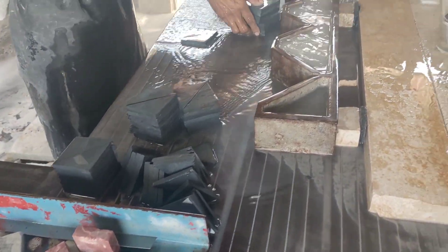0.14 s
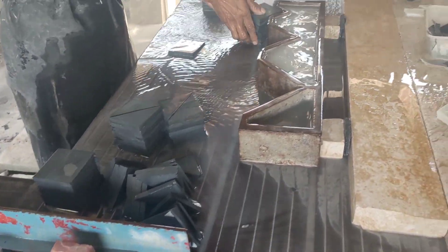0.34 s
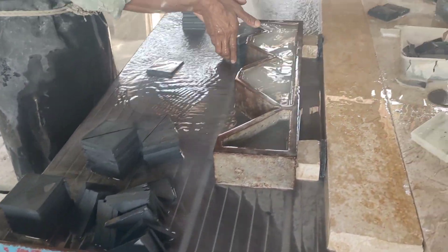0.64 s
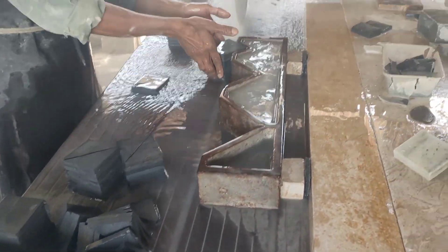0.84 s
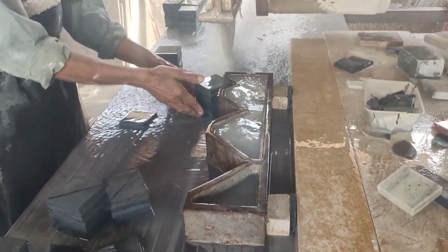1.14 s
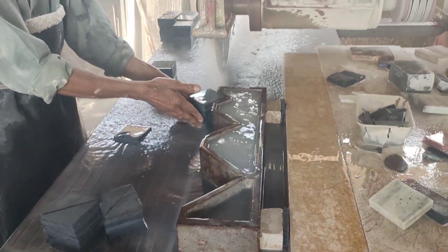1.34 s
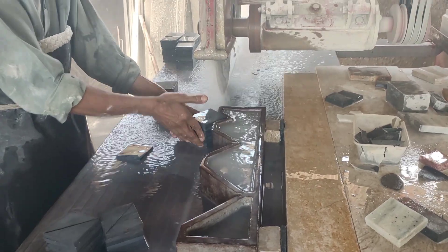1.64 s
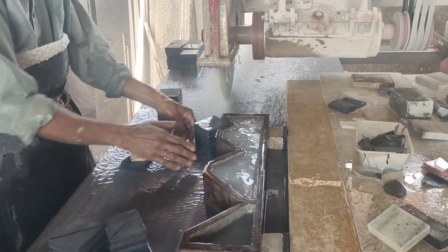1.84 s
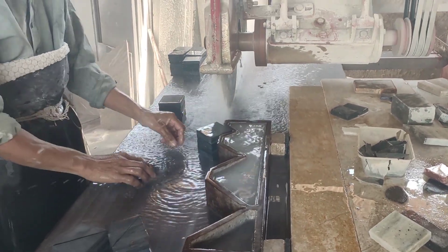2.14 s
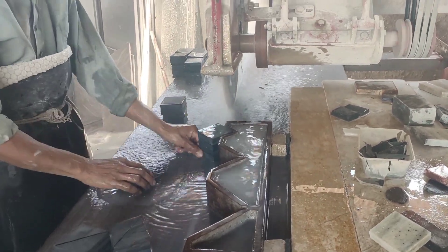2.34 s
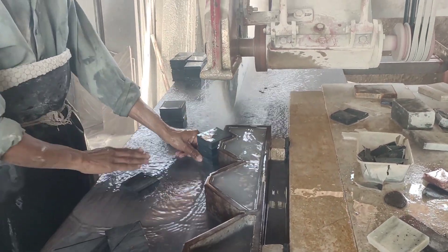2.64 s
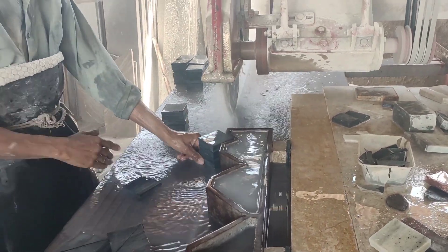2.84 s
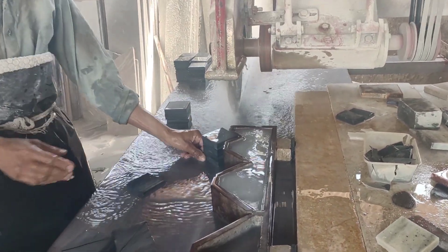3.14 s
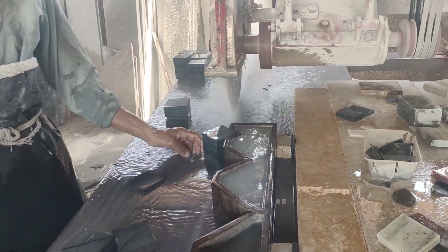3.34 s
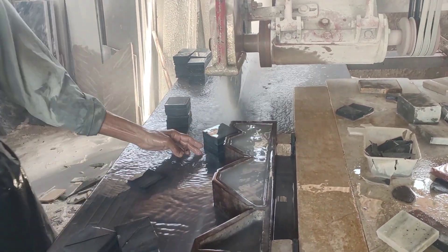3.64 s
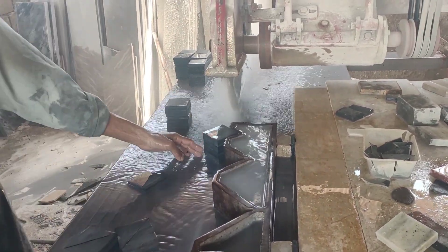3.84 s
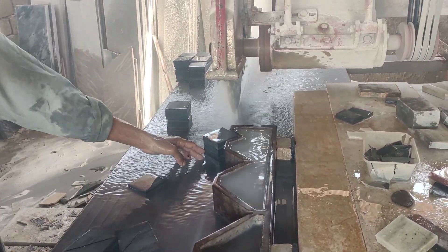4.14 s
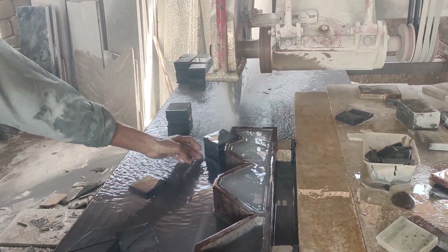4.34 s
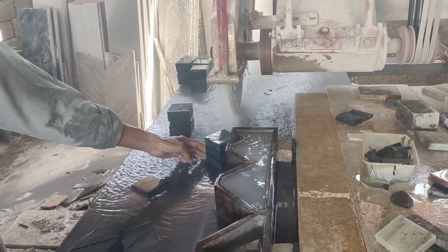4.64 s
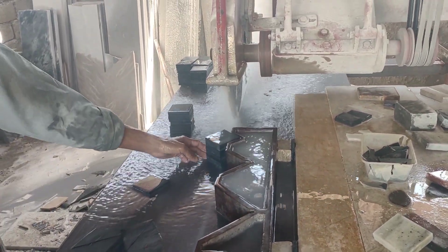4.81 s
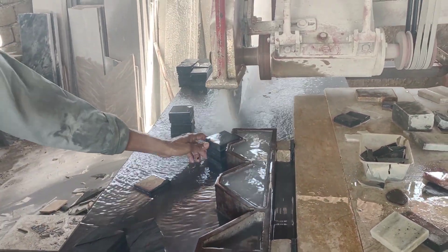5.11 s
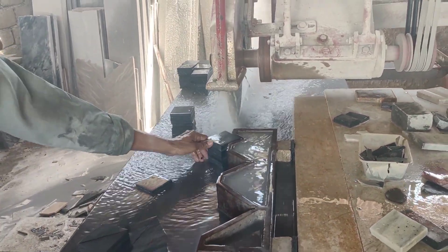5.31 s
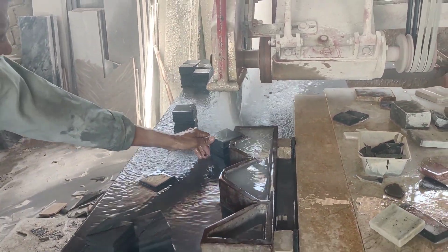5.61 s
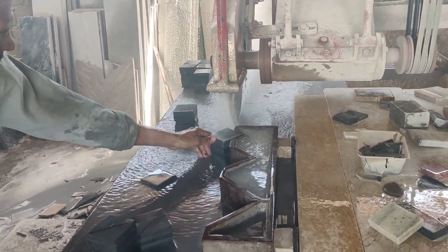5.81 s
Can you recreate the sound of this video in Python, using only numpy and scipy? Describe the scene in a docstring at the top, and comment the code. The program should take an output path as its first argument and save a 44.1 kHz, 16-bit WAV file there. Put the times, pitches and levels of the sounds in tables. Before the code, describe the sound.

From 0 to about 6 seconds a water-cooled stone saw runs continuously at constant speed, loud and close. Its worn ball bearing gives a dense, rough metallic whine: many closely spaced tones, strongest from a few hundred hertz to about two kilohertz, with a shrill layer around three to four kilohertz that is much stronger on the right. The tones beat and drift slightly as the hand-held stereo microphone moves. Around them is a broad wet roar of the spinning blade, with hollow resonances, and a thin hiss of spray. A faint mains hum swells and fades underneath. Soft low air puffs brush the left side at about 0.2 and 0.6 seconds, with a tiny one near 2.2. A faint tile thud comes at 3.7 seconds and a firmer one at 4.0, each with a short low rumble. The saw is still running at the end, without slowing or stopping.

```python
"""Workshop: a water-cooled stone saw runs steadily, heard at a hand-held pair of microphone ports.
A worn eight-ball bearing sings in combs of tones, the loud ones as sines, the faint ones as narrow noise.
The wet blade roars as noise through resonances and the spray hisses as treble noise; a mains hum rises and falls.
Tiles thud softly on the table (one low cycle and a rumble); air puffs on the left port as bass noise.
The right port lifts the whine around 4 kHz."""
import sys
import numpy as np
from scipy import signal
from scipy.fft import rfft, irfft
from scipy.io import wavfile
from scipy.ndimage import uniform_filter1d, minimum_filter1d, map_coordinates

SR = 44100
rng = np.random.default_rng(int(sys.argv[2]) if len(sys.argv) > 2 else 0)


def master_out(mix):
    """Clip the mix to full scale and print it as 16-bit PCM to the path in sys.argv[1]."""
    frames = np.transpose(np.atleast_2d(mix))
    ceiling = np.clip(frames, -1, 1)
    pcm = np.round(ceiling * 32767).astype(np.int16)
    wavfile.write(sys.argv[1], SR, pcm)


def nominal_scale(level):
    """Amplitude ratio for a level in decibels (scalar or array-like)."""
    x = np.asarray(level, float) / 20
    return 10 ** x


N = 263277

SHAFT_HZ = 25.045
INNER_HZ = 123.315  # balls passing a flaw on the turning race
OUTER_HZ = 77.035  # balls passing a flaw on the standing race


def along(points, hz):
    """Reads (Hz, value) points on a log frequency axis."""
    point_hz, values = np.transpose(points)
    return np.interp(np.log(hz + 1), np.log(point_hz + 1), values)


def curves(rows):
    """Interpolates each column after the time to one value per sample."""
    time_s, *columns = np.transpose(rows)
    return [np.interp(np.arange(N) / SR, time_s, column) for column in columns]


def wobble(knots_per_s, count):
    """Smooth random curves through normal knots, held over 64 samples."""
    knots = rng.standard_normal((count, 200))
    position = np.arange(0, N + 64, 64) * knots_per_s / SR
    slow = [map_coordinates(k, [position]) for k in knots]
    return np.repeat(slow, 64, axis=1)[:, :N]


def rush(gain, patchy_db):
    """Stereo turbulence: noise of 0 dB per Hz times gain(Hz), patchy in time and frequency, alike in the bass."""
    # left-right likeness: hz, correlation
    likeness = [(25, .4), (70, 0.97), (130, 0.94), (290, 0.96), (640, 0.49), (1410, 0.038), (3100, 0.046),
                (6800, .02)]
    # right port over left: hz, level_db
    right_over_left = [(30, 0), (500, 0), (1900, 1.5), (2400, 5), (2900, 11.5), (3500, 15.5), (4500, 13.5),
                       (5300, 14), (6400, 3), (7000, -3), (8200, 7.5), (8600, -17), (9500, -12), (9900, -1),
                       (12200, 0), (13500, -6.5), (14600, -8)]
    spectrum = signal.stft(rng.standard_normal((2, N + 8192)), nperseg=512)[2]
    patches = rng.standard_normal(spectrum.shape[1:])
    patches = uniform_filter1d(uniform_filter1d(patches, size=8, axis=0), size=8, axis=1)
    pair = signal.istft(spectrum * nominal_scale(patchy_db * patches / patches.std()), nperseg=512)[1]
    length = pair.shape[1]
    hz = np.fft.rfftfreq(length, 1 / SR)
    angle_rad = np.arccos(np.clip(along(likeness, hz), -1, 1)) / 2
    shares = [np.cos(angle_rad), np.sin(angle_rad)]
    mid, side = rfft(pair) * shares * gain(hz) * np.sqrt(SR / 2)
    left = mid + side
    right = (mid - side) * nominal_scale(along(right_over_left, hz))
    return irfft([left, right], length)[:, :N]


def hum():
    """Mains hum of a neighbouring machine: one sine of varying level."""
    # hum level: time_s, rms_db
    hum_levels = [(0.0, -54), (1.23, -59), (1.58, -64), (2.19, -55), (3.16, -62), (3.74, -51), (4.36, -69),
                  (5.27, -48.5), (5.97, -52.5)]
    return np.sqrt(2) * nominal_scale(curves(hum_levels)[0]) * np.sin(2 * np.pi * 49.9 * np.arange(N) / SR)


def puffs():
    """Short gusts of air buffet the left port only: bass-heavy noise in Gaussian bursts."""
    # gusts: centre_s, half_length_s, rms_db at the centre
    gust_rows = [(.21, .05, -45), (.545, .03, -45), (.615, 0.04, -39), (2.175, .015, -42)]
    # relative spectrum of the air: hz, level_db per Hz
    air_colour = [(12, -30), (25, -3), (70, -2), (130, -8), (200, -22), (400, -60)]
    hz = np.fft.rfftfreq(N, 1 / SR)
    air = irfft(rfft(rng.standard_normal(N)) * nominal_scale(along(air_colour, hz)), N)
    t = np.arange(N) / SR
    gust = sum(nominal_scale(db) * np.exp(-((t - s) / half_s) ** 2) for s, half_s, db in gust_rows)
    return np.array([gust * air / air.std(), np.zeros(N)])


def thuds():
    """Tiles set down, a soft contact: one low cycle, then a short rumble of the table."""
    # contacts: start_s, push_db, push_hz, rumble_db
    contacts = [(3.684, -28, 150, -39), (3.96, -22, 191, -31.5)]
    out = np.zeros(N + SR)
    t = np.arange(SR // 4) / SR
    low_band = signal.butter(2, [60, 260], "band", fs=SR, output="sos")
    for start_s, push_db, push_hz, rumble_db in contacts:
        push = np.sin(2 * np.pi * push_hz * t) * np.exp(-((t * push_hz - .68) / 0.74) ** 2)
        rumble = signal.sosfilt(low_band, rng.standard_normal(len(t)))
        envelope = nominal_scale(-60 * t / 0.44) * (1 - np.exp(-t / 0.0091))  # -60 dB in 0.44 s, 9.1 ms rise
        rumble *= envelope / rumble.std()
        out[round(start_s * SR):][:len(t)] += nominal_scale(push_db) * push + nominal_scale(rumble_db) * rumble
    return out[:N]


def blade():
    """Water and air tear at the spinning blade and ring its resonances; the spray adds a thin top."""
    # change of level: time_s, roar_db, spray_db
    load = [(0, .5, 0), (1, -0.4, 0), (2.5, -0.4, .1), (4, -0.4, 0.1), (5.97, -0.5, -0.3)]
    # roar of motor and wet blade at the left port, before resonances and load: hz, level_db per Hz
    roar_colour = [(20, -83), (60, -76), (85, -75), (200, -71.5), (600, -70.5), (1000, -71), (1520, -69),
                   (2400, -66), (4200, -69), (5400, -72), (6400, -73.5), (7300, -84.5), (8100, -103),
                   (8600, -125)]
    # resonances of blade, guard and frame: centre_hz, width_hz, level_db over the roar
    resonances = [(125.5, 22, 5), (272, 125, 0.5), (453, 146, 4), (752, 112, 5.5), (1098, 190, 7.5),
                  (1408, 95, 9.5), (1628, 42, 7.5), (1790, 140, 5), (1915, 150, 6), (2770, 126, -3),
                  (3210, 210, -1), (3750, 430, 3), (5210, 170, -4)]
    # fine spray at the left port, before load: hz, level_db per Hz
    spray_colour = [(7600, -125), (8150, -104), (8600, -89.5), (9400, -89.5), (9800, -92.5), (11200, -88),
                    (12100, -94), (13800, -89), (14600, -100), (15100, -104), (15200, -130)]

    def ring(hz):
        peaks = (nominal_scale(db) ** 2 / (1 + (2 * (hz - centre_hz) / width_hz) ** 4)
                 for centre_hz, width_hz, db in resonances)
        return np.sqrt(1 + sum(peaks))

    roar_db, spray_db = curves(load)
    roar = rush(lambda hz: nominal_scale(along(roar_colour, hz)) * ring(hz), patchy_db=0.81)
    spray = rush(lambda hz: nominal_scale(along(spray_colour, hz)), patchy_db=1.1)
    return nominal_scale(roar_db) * roar + nominal_scale(spray_db) * spray


def faint_combs():
    """The weaker multiples and sidebands of both races waver like very narrow noise."""
    # tooth tops at the left port, before sideband levels: hz, level_db per Hz
    comb_colour = [(150, -78), (220, -63.5), (400, -60.5), (600, -60), (800, -57.5), (1400, -56.5),
                   (2000, -59), (2600, -64), (3200, -61.5), (3800, -59.5), (5200, -69), (6000, -91)]
    # turning race, {shaft sideband: level_db}
    inner_sides = {-2: -3, -1: 0, 0: -0.82, 1: 0, 2: -3.3, 3: -9}
    # standing race, {shaft sideband: level_db}
    outer_sides = {-1: -8.5, 0: -0.75, 1: -5}
    tooth_half_width_hz = 0.86

    def teeth(hz, ball_hz, sides):
        """Power of sidebands around every multiple of the ball rate."""
        def off_hz(side):
            return (hz - side * SHAFT_HZ + ball_hz / 2) % ball_hz - ball_hz / 2
        return sum(nominal_scale(db) ** 2 / (1 + (off_hz(side) / tooth_half_width_hz) ** 4)
                   for side, db in sides.items())

    def both(hz):
        return np.sqrt(teeth(hz, INNER_HZ, inner_sides) + teeth(hz, OUTER_HZ, outer_sides))

    return rush(lambda hz: nominal_scale(along(comb_colour, hz)) * both(hz), patchy_db=-0.7)


def tones(drift_db, drift_rad):
    """Each race sounds multiples of its ball rate, split by the shaft turn; the moving hand shifts each tone."""
    # turning race, before drift: multiple, shaft_sideband, left_db, right_db, swell_db from start to end
    inner_rows = [(2, -2, -56, -56, 1), (2, 0, -50, -52, 6), (2, 1, -44, -45, -2), (3, -1, -40, -42, -2),
                  (3, 1, -49, -47, -5), (3, 2, -53, -51, -6), (3, 3, -53, -52, 0), (4, -1, -44, -46, 1),
                  (5, -1, -52, -53, -4), (5, 1, -55, -52, 4), (6, -1, -46, -40, 1), (6, 0, -45, -49, -3),
                  (6, 1, -52, -48, -3), (6, 2, -42, -48, 3), (6, 3, -49, -57, -3), (7, -1, -50, -54, -8),
                  (7, 0, -47, -47, -1), (7, 1, -52, -46, 8), (10, 0, -47, -53, 6), (10, 1, -51, -47, -6),
                  (10, 2, -47, -50, -1), (11, -1, -41, -43, 4), (11, 0, -51, -43, 2), (11, 1, -44, -34, -4),
                  (11, 2, -52, -46, 0), (11, 3, -47, -49, -3), (12, -1, -47, -50, 2), (15, 1, -45, -46, 0),
                  (16, 1, -46, -39, 0), (26, -1, -53, -39, 0), (26, 0, -50, -41, 8)]
    # standing race, before drift: multiple, shaft_sideband, left_db, right_db, swell_db from start to end
    outer_rows = [(5, 0, -49, -53, 2), (6, 0, -42, -44, 1), (10, 0, -64, -50, -4), (10, 1, -50, -52, 2),
                  (14, -2, -47, -52, -4), (14, 0, -46, -53, 2), (15, 0, -50, -49, 0), (17, 0, -50, -48, 4),
                  (18, 0, -40, -41, -3), (18, 1, -51, -48, 1), (18, 2, -48, -43, -4), (23, 0, -50, -50, 4)]
    # motor, belt and blade, before drift: pitch_hz, left_db, right_db, swell_db from start to end
    other_rows = [(25.0, -58, -58, 1), (40.8, -52, -53, -2), (240.3, -54, -56, 12), (1298.0, -49, -49, 4),
                  (1755.0, -43, -42, -5), (1790.7, -51, -44, -3), (1836.7, -51, -48, -4),
                  (1954.5, -46, -46, -4), (2609.1, -53, -45, -3), (3133.3, -57, -42, 4),
                  (3151.7, -49, -35, 0), (3191.0, -56, -42, 0), (3233.3, -50, -41, 8),
                  (3913.7, -50, -39, 2), (4074.0, -64, -42, -4), (4301.5, -66, -43, -8),
                  (4707.2, -63, -42, 2)]
    # phase lead of left port over right, before drift: hz, lead_rad
    left_lead = [(100, 0), (700, 0.3), (880, -0.5), (1240, -1.6), (1385, 0.65), (1460, -1.7), (1760, -3),
                 (1795, -1.2), (1840, -1), (1880, -2.5), (1955, -1.56), (3200, -1)]
    in_step_s = 1.057  # close tones of both races are in step here, apart from drift and port lead

    def race(race_rows, ball_hz):
        return [(k * ball_hz + side * SHAFT_HZ, *rest) for k, side, *rest in race_rows]

    rows = race(inner_rows, INNER_HZ) + race(outer_rows, OUTER_HZ) + [tuple(r) for r in other_rows]
    rows = np.array(sorted(rows))
    # tones a few Hz apart share the frame's phase, so they beat
    group = np.cumsum(np.diff(rows[:, 0], prepend=0) > 8)
    phases_rad = rng.uniform(0, 2 * np.pi, len(rows) + 1)[group]
    out = np.zeros((2, N))
    t = np.arange(N) / SR - in_step_s
    for (hz, left_db, right_db, swell_db), phase_rad in zip(rows, phases_rad):
        # short waves change more with a small move
        drifts = np.clip(hz / 2400, .15, 1) * wobble(knots_per_s=0.78, count=4)
        left_drift, right_drift, phase_drift, lead_drift = drifts
        right_rad = 2 * np.pi * hz * t + phase_rad + drift_rad * phase_drift
        left_rad = right_rad + along(left_lead, hz) + 1.6 * drift_rad * lead_drift
        swell = nominal_scale(np.linspace(-swell_db / 2, swell_db / 2, N))
        out[0] += swell * nominal_scale(left_db + drift_db * left_drift) * np.cos(left_rad)
        out[1] += swell * nominal_scale(right_db + drift_db * right_drift) * np.cos(right_rad)
    return np.sqrt(2) * out  # levels are rms


def scene():
    """Sums all sources at the two ports; the thuds land about 1 dB louder on the left and 1 dB quieter on the
    right."""
    background = hum() + puffs() + thuds() * nominal_scale([[1], [-1]])
    return background + blade() + faint_combs() + tones(drift_db=3, drift_rad=0.46)


def roll_off(x):
    """The treble ends steeply here."""
    return signal.sosfilt(signal.butter(12, 15160, fs=SR, output="sos"), x)


def record(dry):
    """A fast limiter on each port rounds the highest peaks, those above -8 dB."""
    need = np.minimum(1, nominal_scale(-8) / (np.abs(dry) + 1e-9)) ** .65
    held = minimum_filter1d(need, size=89)  # 2 ms
    gain = uniform_filter1d(uniform_filter1d(held, size=45), size=45)
    return roll_off(dry * gain)


dry = scene()
out = record(dry)
master_out(out)
```